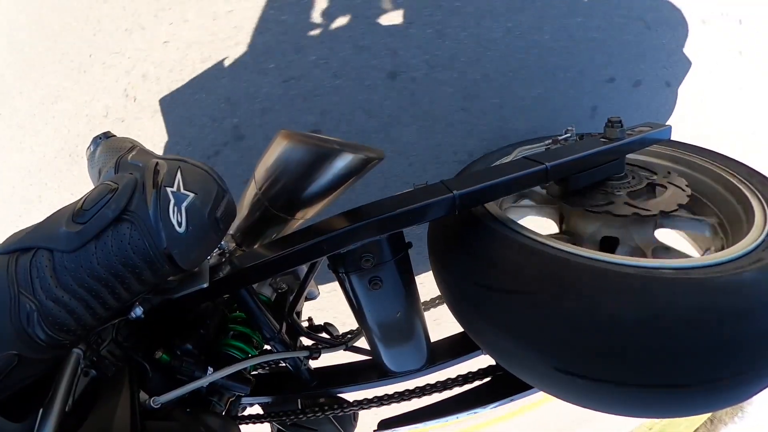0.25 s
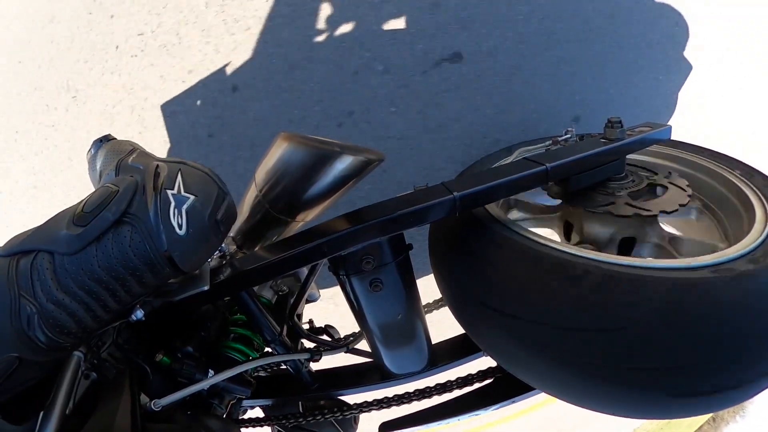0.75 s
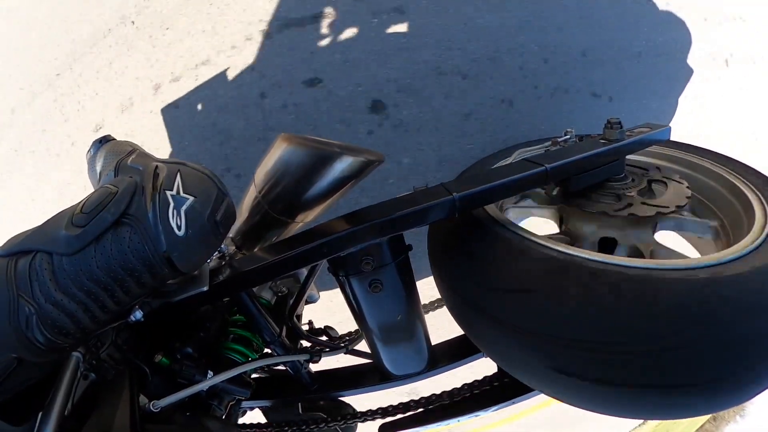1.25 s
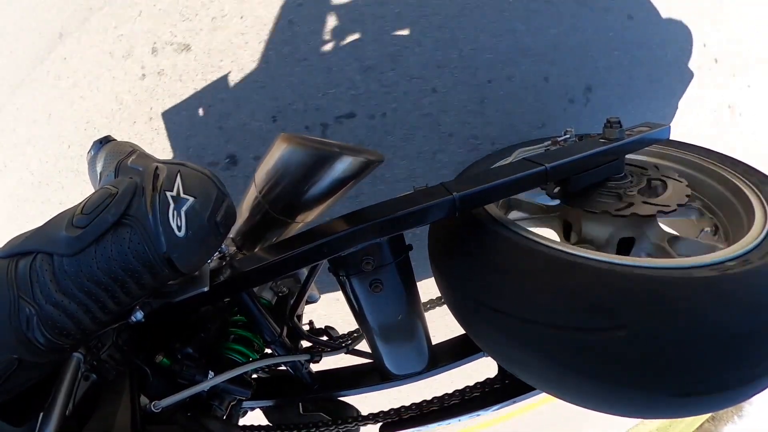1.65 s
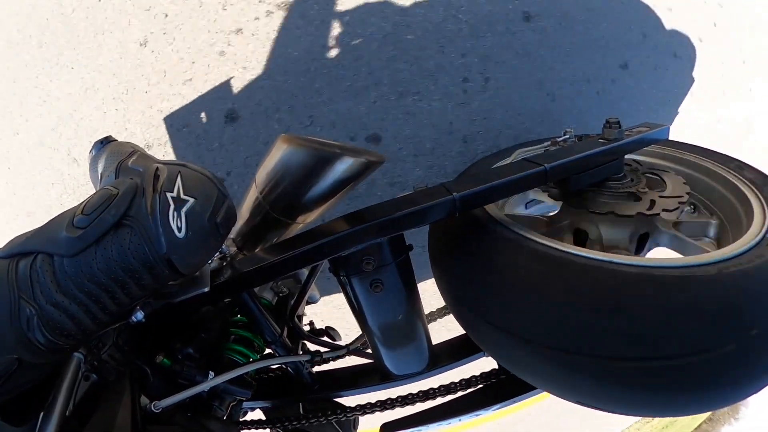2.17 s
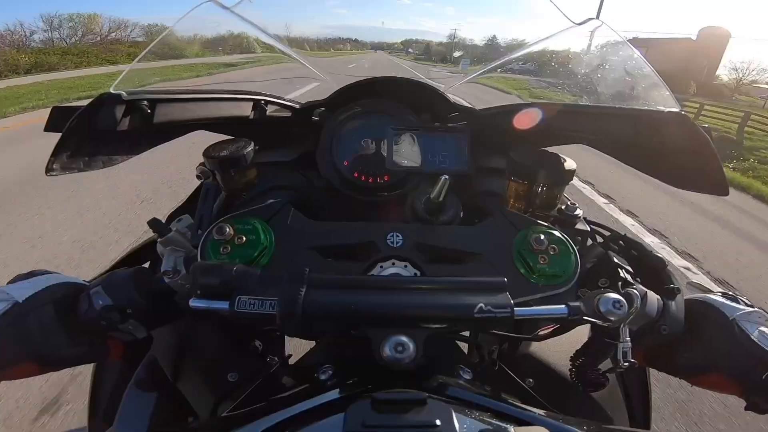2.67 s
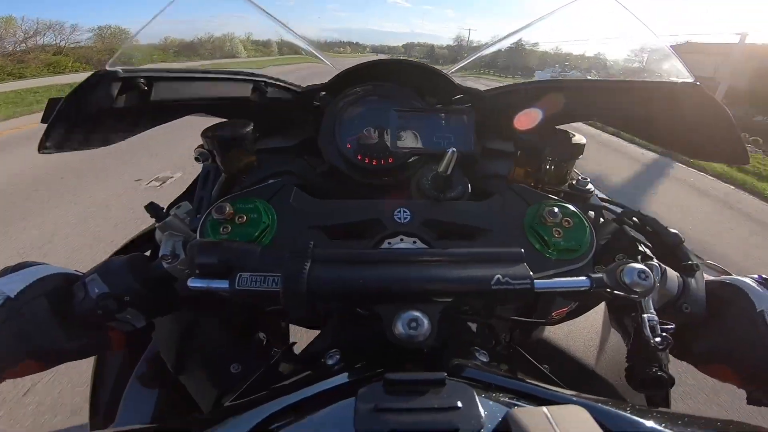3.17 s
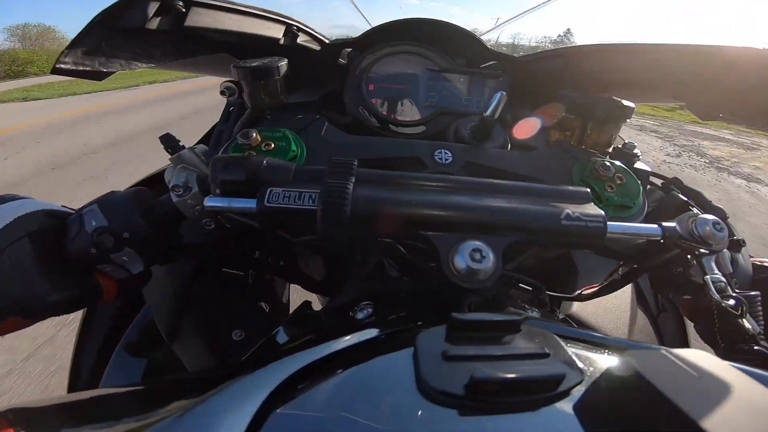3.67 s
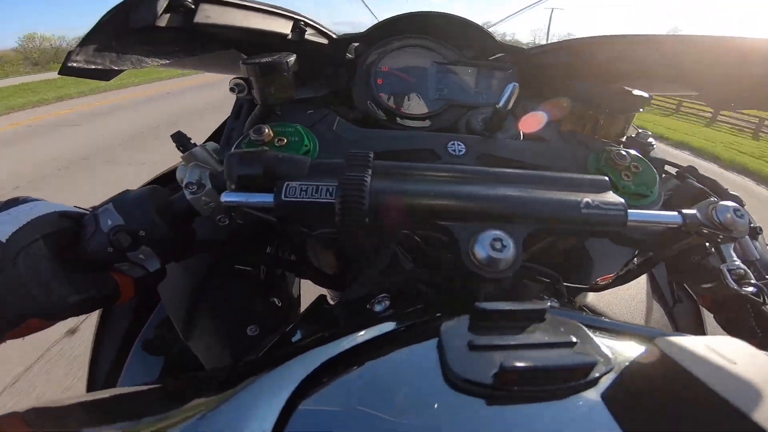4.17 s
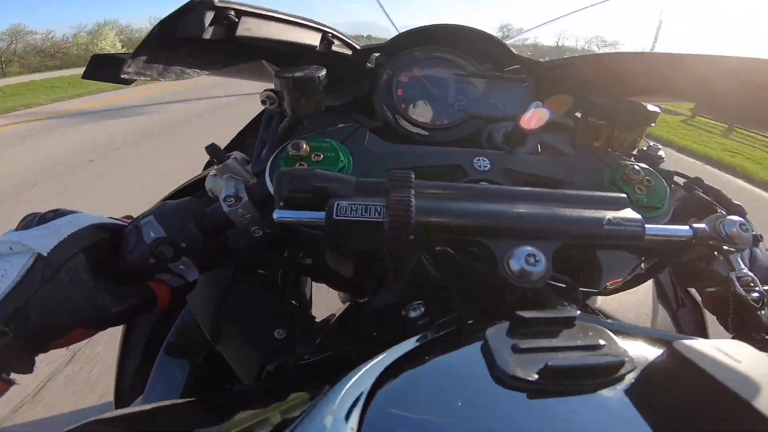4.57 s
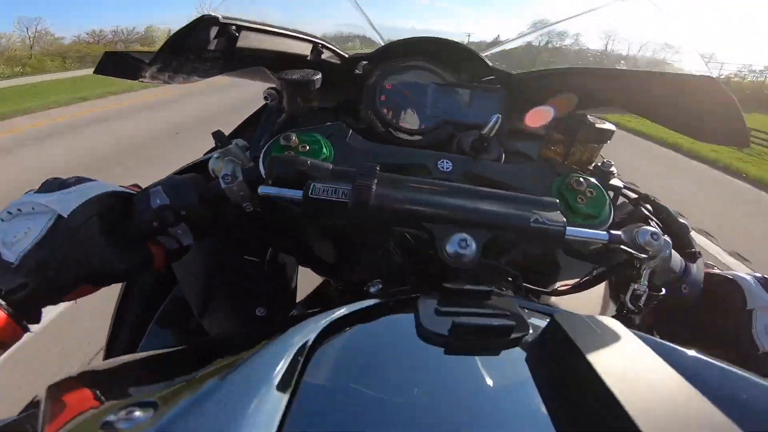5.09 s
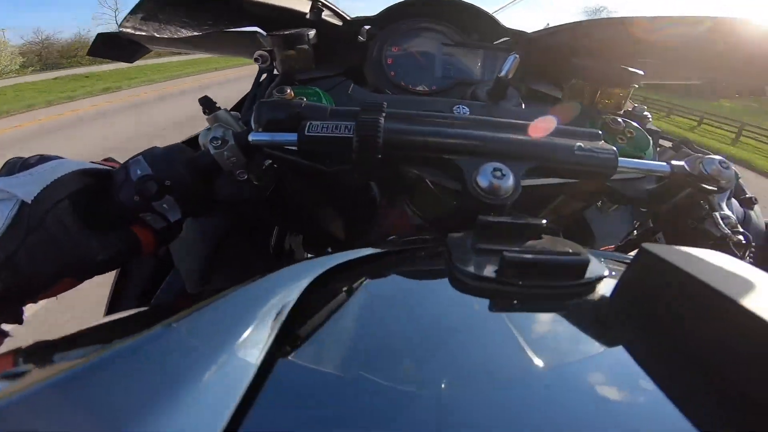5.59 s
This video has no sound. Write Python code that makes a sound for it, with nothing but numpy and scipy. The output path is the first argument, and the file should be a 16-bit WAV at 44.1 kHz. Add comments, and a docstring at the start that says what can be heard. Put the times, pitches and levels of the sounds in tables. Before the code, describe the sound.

A sport motorcycle burbles and blips dully near its rear wheel, then abruptly screams up in revs, shifts, and pulls again in the wind.

```python
"""Sport motorcycle, blips and pull

A four-cylinder engine heard from two places. First, dull and close by the rear wheel, five throttle blips
from low revs: beat harmonics boom, beats and gas noise ring the tail pipe. Then, from the tank, a hard pull,
an ignition cut for the gear shift and a second pull: orders of the four-stroke cycle through the pipe, with
pulsing hiss. Filtered noise makes rumble, rattle, ticks and wind on the microphone; one low push the thump.
"""
import sys
import numpy as np
from scipy import signal
from scipy.io import wavfile
from scipy.ndimage import uniform_filter1d

SR = 44100
rng = np.random.default_rng(int(sys.argv[2]) if len(sys.argv) > 2 else 0)


def unload_audio(sound):
    """Save the sound as a 16-bit wav file, at the path given as the first command line argument."""
    columns = np.transpose(np.atleast_2d(sound))
    # keep every value between -1 and 1, then stretch to whole-number steps
    steps = np.round(np.clip(columns, -1, 1) * 32767)
    wavfile.write(sys.argv[1], SR, steps.astype(np.int16))


def elevation(decibels):
    """Turn decibel levels (scalar or array-like) into linear amplitude ratios."""
    levels = np.asarray(decibels, float)
    return 10 ** (levels / 20)


N = 257544

# throttle blips: firing resumes t/s, revs climb t/s, throttle shuts t/s, revs down t/s, top rate/(beats/s)
BLIPS = [(-.3, -.25, -.08, .155, 49), (.232, .28, .52, .70, 55.7), (.70, .83, 1.06, 1.235, 48),
         (1.218, 1.33, 1.578, 1.72, 48.7), (1.70, 1.85, 2.09, 2.29, 51.2), (2.342, 2.385, 2.635, 2.85, 60)]
# silencer while firing: rate/(beats/s), boom harmonics 1, 2 and 3 level/dB, bark level/dB
SILENCER = [(31, -36, -13.5, -27, -20), (40, -25, -17, -20, -16.5), (46, -19, -18, -22, -13),
            (49, -17, -21, -27, -12), (55, -13.5, -24, -28, -12.5), (60, -14.5, -32, -27, -13)]
# tail pipe modes: f/Hz, width/Hz, level/dB
TAIL_PIPE_MODES = [(161.6, 77, -4.5), (237, 69, 7.5), (318.8, 37.3, 1.5), (506, 59, -12.5)]
# ragged rumble of the silencer: f/Hz, density/(dB per Hz)
RUMBLE_SPECTRUM = [(20, -12), (35, -4), (62, 0), (100, -3), (150, -5), (220, -14), (400, -45), (900, -95)]
# frame rattle: f/Hz, density/(dB per Hz)
RATTLE_SPECTRUM = [(300, -23), (500, 3), (700, -9.5), (950, -15.5), (1600, -17.5), (2700, -15.5),
                   (4000, -19), (6000, -26), (7400, -30.5), (8300, -42.5), (11500, -52.5), (14000, -79.5)]
LOW_BEATS_PER_S, BLIPS_END_S, THROTTLE_LAG_S = 31, 2.645, 0.015
UNEVEN_FIRING, UNEVEN_OVERRUN = 0.17, 0.3  # 0 steady .. 1 ragged
OVERRUN_BOOM_DB, OVERRUN_BARK_DB = -6.5, -7  # change while the throttle is shut
MISFIRE_DB = 4.5  # rms waver of the boom on the overrun
RUMBLE_DB, RUMBLE_SWING_DB, RATTLE_DB = -24.5, 2.4, -37

# engine speed, one list a gear: t/s, rate/(firings/s)
GEARS = [
    [(2.642, 199.2), (2.745, 201.2), (3.045, 216.3), (3.145, 225.3), (3.445, 250.4), (3.745, 281.0),
     (3.945, 305.2), (4.045, 312.4), (4.445, 359.5), (4.545, 392.3), (4.645, 412.6), (4.745, 423.7),
     (4.828, 426.3)],
    [(4.905, 333.0), (5.005, 337.3), (5.105, 332.8), (5.205, 340.7), (5.405, 353.9), (5.705, 378.4),
     (5.84, 385.7)],
]
# full throttle: rate/(firings/s), firing tones level/dB, howl level/dB, bite/(dB per octave), hiss level/dB
FULL_THROTTLE = [(201, -11, -34.5, -8.5, -42.5), (212.7, -10.5, -30, -5.5, -42.5),
                 (221.6, -10.5, -24, -5.5, -40.5), (239, -11, -29, -2, -38.5),
                 (270, -12, -24.5, -6.5, -35.5), (305, -7.5, -24.5, -4.5, -32),
                 (329, -9.5, -22.5, -1.5, -30), (370, -8.5, -23.5, 0, -30), (403, -7.5, -22, 0.5, -28.5),
                 (415, -7.3, -20, 3.5, -25)]
# added in each gear: tones level/dB, howl level/dB, bite/(dB per octave), hiss level/dB,
# start bang level/dB (as ignition returns, in the second gear)
GEAR_OFFSETS = [(0, -2.05, -1.5, -0.5, -0.5), (-0.5, -3.5, 3, -.5, 10.5)]
# pipe at the firing tones: f/Hz, level/dB
PIPE_AT_FIRING = [(200, 2), (260, 1), (305, -10), (350, -5), (420, -7.5), (520, -7), (610, -6.5), (720, -3),
                  (840, -7), (900, -9), (945, -31), (1000, -5.5), (1080, -7), (1180, -25.5), (1300, -39)]
# pipe at the other orders: f/Hz, level/dB
PIPE_AT_ORDERS = [(50, -5), (150, 2.5), (300, -5.5), (480, -6.5), (610, -9.5), (700, -2), (780, -1.5),
                  (950, -4.5), (1150, -5.5), (1380, -7), (1520, -11), (1700, -12), (1900, -12), (2200, -12),
                  (2500, -15.5), (2750, -15), (3500, -19), (5000, -33.5)]
# uneven cylinders, below and above SPLIT_ORDER: level/dB of orders 0, 1, 2 and 3 above a multiple of firing
LOW_ORDERS_DB = (5.5, -0.55, 0, -0.6)
HIGH_ORDERS_DB = (-2.5, -12.5, -3, 2.5)
# orders that break the pattern: order, added level/dB
STRAY_ORDERS_DB = {6: -5, 15: -6, 17: -3, 26: -4}
# gas hiss: f/Hz, density/(dB per Hz)
HISS_SPECTRUM = [(400, -18), (900, -9), (1500, -7), (2200, -5), (3400, -4.5), (5000, -6), (9400, -11),
                 (12500, -18), (15600, -27)]
SPLIT_ORDER, TOP_ORDER, BANG_DECAY_S = 30, 68, 0.011
BLADES_PER_FIRING = 31.3  # blower blade passes
WHINE_DB, WHINE_DB_PER_OCTAVE = -27.5, 10  # against the hiss, at 380 firings/s
THUMP_S, THUMP_DB, THUMP_RISE_S = 4.827, -5, 0.004

# loose metal ticks: t/s, level/dB
TICKS = [(.487, -44), (0.892, -36), (2.137, -36), (2.283, -50), (2.363, -54)]
# wind: t/s, buffet level/dB, rush level/dB
WIND = [(2.64, -19, -31), (3.0, -17, -29.5), (3.5, -19.5, -34), (3.8, -15, -31), (4.0, -13.5, -27),
        (4.599, -15.5, -35), (4.83, -13.5, -26.5), (5.2, -13.5, -27), (5.84, -14, -37.5)]
# buffet: f/Hz, density/(dB per Hz)
BUFFET_SPECTRUM = [(8, 4.5), (30, 2.5), (80, -5.5), (180, -7.5), (300, -17), (600, -36.5), (1200, -26),
                   (3000, -69.5)]
# rush: f/Hz, density/(dB per Hz)
RUSH_SPECTRUM = [(240, -33), (400, -8), (643, -8.5), (716, -2), (1040, -17), (1830, -15.5), (3810, -27.5),
                 (11200, -37), (15600, -47)]


def evened(x):
    """Scales to rms 1."""
    return x / np.sqrt(np.mean(x ** 2) + 1e-20)


def read(points, hz):
    """Reads a spectrum on a log-frequency axis."""
    f, value = np.transpose(points)
    return np.interp(np.log(hz + 1), np.log(f + 1), value)


def curves(rows, at):
    """Columns of a table read along its first column."""
    first, *columns = np.transpose(rows)
    return [np.interp(at, first, c) for c in columns]


def span(start_s, end_s):
    """Sample times between two moments, and a 2 ms fade at both ends."""
    t = np.arange(start_s, end_s, 1 / SR)
    return t, np.clip(np.minimum(t - start_s, end_s - t) / 0.002, 0, 1)


def add(mix, start_s, sound):
    """Mixes a sound in at start_s."""
    part = mix[round(start_s * SR):][:len(sound)]
    part += sound[:len(part)]


def noise(n, spectrum, patchy_db):
    """Random short-time spectra with drifting patches, rms 1."""
    real, imag, patches = rng.standard_normal((n // 256 + 5, 513, 3)).T
    patches = uniform_filter1d(patches, size=14, axis=0)  # across frequency
    patches = evened(uniform_filter1d(patches, size=8, axis=1))  # across time
    hz = np.fft.rfftfreq(1024, 1 / SR)
    z = (real + 1j * imag) * elevation(read(spectrum, hz)[:, None] + patchy_db * patches)
    return evened(signal.istft(z, nperseg=1024, noverlap=768)[1][:n])


def wander(n, size):
    """Noise smoothed twice over size steps, rms 1."""
    smooth = uniform_filter1d(rng.standard_normal(n), size)
    return evened(uniform_filter1d(smooth, size))


def ring(x, modes):
    """Damped modes struck by x, rms 1; their gradual onset keeps the treble dark."""
    t = np.arange(SR // 8) / SR
    shape = sum(elevation(db) * width * np.exp(-np.pi * width * t) * np.sin(2 * np.pi * hz * t)
                for hz, width, db in modes)
    shape = shape * (1 - np.exp(-t / 0.0024))
    return evened(signal.oaconvolve(x, shape)[:len(x)])


def throttle(t):
    """Revs climb on a quarter sine and sink on a half cosine; overrun from shutting until firing resumes."""
    rate, firing = np.full(len(t), LOW_BEATS_PER_S, float), np.zeros(len(t))
    for fires, climbs, shuts, down, top in BLIPS:
        up = np.clip((t - climbs) / (shuts - climbs), 0, 1)
        sink = np.clip((t - shuts) / (down - shuts), 0, 1)
        rise = np.sin(np.pi / 2 * up) * np.cos(np.pi / 2 * sink) ** 2
        rate = rate + (top - LOW_BEATS_PER_S) * rise
        firing = firing + np.clip((t - fires) / THROTTLE_LAG_S, 0, 1)
        firing = firing - np.clip((t - shuts) / THROTTLE_LAG_S, 0, 1)
    return rate, 1 - np.clip(firing, 0, 1)


def blips():
    """Exhaust beats boom in the silencer and crack in the tail pipe; on the overrun they turn ragged."""
    t, fade = span(0, BLIPS_END_S)
    n = len(t)
    rate, overrun = throttle(t)
    *tones_db, bark_db = curves(SILENCER, rate)
    bark_db = bark_db + OVERRUN_BARK_DB * overrun
    uneven = np.clip(UNEVEN_FIRING + (UNEVEN_OVERRUN - UNEVEN_FIRING) * overrun, 0, 1)
    turns = np.cumsum(rate) / SR  # one per exhaust beat
    boom = sum(-np.sqrt(2) * elevation(db) * np.cos(k * (2 * np.pi * turns - 0.65))
               for k, db in enumerate(tones_db, 1))

    beats = np.diff(np.floor(turns), prepend=0) / np.sqrt(rate)
    beats = beats * elevation(0.35 * uneven * rng.standard_normal(n))
    flow = rng.standard_normal(n)  # turbulent gas between the beats
    drive = (1 - uneven) * -evened(beats - beats.mean()) + 2.6 * uneven * flow
    bark = ring(drive, TAIL_PIPE_MODES)

    rattle = noise(n, RATTLE_SPECTRUM, patchy_db=1.93) * (1 + 0.14 * np.cos(2 * np.pi * turns - 0.8))
    rattle *= elevation(0.11 * bark_db)  # the frame buzzes a little more under throttle

    rumble_gain = elevation(RUMBLE_DB + RUMBLE_SWING_DB * wander(n, size=2000))
    rumble = rumble_gain * noise(n, RUMBLE_SPECTRUM, patchy_db=1.0)
    boom_gain = elevation((OVERRUN_BOOM_DB + MISFIRE_DB * wander(n, size=900)) * overrun)
    return 0, fade * (boom_gain * boom + rumble + elevation(bark_db) * bark + elevation(RATTLE_DB) * evened(rattle))


def firing_tones(cycle, rate):
    """Firing rate and its next two harmonics, weighted by the pipe."""
    return sum(-elevation(read(PIPE_AT_FIRING, k * rate)) * np.cos(4 * k * cycle + 0.6 * k * k)
               for k in (1, 2, 3))


def order_howl(cycle, rate, bite_db):
    """Remaining orders of the four-stroke cycle through the pipe, each wavering in level."""
    n = len(rate)
    howl, coarse = np.zeros(n), np.arange(0, n, 64)
    for k in range(1, TOP_ORDER + 1):
        if k in (4, 8, 12):  # the firing tones
            continue
        hz = k * rate[coarse] / 4
        pattern_db = LOW_ORDERS_DB if k < SPLIT_ORDER else HIGH_ORDERS_DB
        order_db = pattern_db[k % 4] + STRAY_ORDERS_DB.get(k, 0)
        tilt_db = bite_db[coarse] * np.log2(np.maximum(hz, 1400) / 1500)
        level_db = order_db + read(PIPE_AT_ORDERS, hz) + tilt_db
        level_db += 3.8 * wander(len(hz), size=70)  # the cylinders never burn quite alike
        gain = np.interp(np.arange(n), coarse, elevation(level_db))
        howl += gain * np.cos(k * cycle + 2 * np.pi * rng.random())
    return howl


def gas_hiss(cycle, rate):
    """Gas noise pulsing with firings and cycle, plus a faint blower whine at the blade rate."""
    n = len(rate)
    hiss = noise(n, HISS_SPECTRUM, patchy_db=1.1)
    hiss = hiss * (1 + 0.25 * np.cos(4 * cycle) + 0.12 * np.cos(cycle))
    whine_db = WHINE_DB + WHINE_DB_PER_OCTAVE * np.log2(rate / 380) + 4.9 * wander(n, size=2500)
    return hiss + elevation(whine_db) * np.cos(4 * BLADES_PER_FIRING * cycle)


def pull(speed, offsets):
    """One gear: firing tones, howl and hiss locked to one engine cycle of four firings."""
    t, fade = span(speed[0][0], speed[-1][0])
    (rate,) = curves(speed, t)
    tones_db, howl_db, bite_db, hiss_db = (
        c + more for c, more in zip(curves(FULL_THROTTLE, rate), offsets))
    bang = elevation(offsets[-1] * np.exp(-(t - t[0]) / BANG_DECAY_S))
    cycle = 2 * np.pi * np.cumsum(rate / 4) / SR
    cycle = cycle + 0.003 * wander(len(t), size=300)  # combustion timing scatters, rad
    tones = firing_tones(cycle, rate)
    howl = order_howl(cycle, rate, bite_db)
    hiss = gas_hiss(cycle, rate)
    return t[0], fade * (elevation(tones_db) * tones + bang * (elevation(howl_db) * howl + elevation(hiss_db) * hiss))


def thump():
    """Low push as the drive unloads: rises fast, sags slowly."""
    out, u = np.zeros(N), np.arange(SR // 10) / SR / THUMP_RISE_S
    add(out, THUMP_S, elevation(THUMP_DB) * u * np.exp(1 - u))
    return 0, out


def ticks():
    """Something loose: short bright bursts of decaying band-passed noise."""
    out, t = np.zeros(N), np.arange(1500) / SR
    band = signal.butter(7, [1500, 7600], "band", fs=SR, output="sos")
    for start_s, db in TICKS:
        burst = np.exp(-t / 0.029) * rng.standard_normal(len(t))
        add(out, start_s, elevation(db) * signal.sosfilt(band, burst))
    return 0, out


def wind():
    """Lumpy low buffeting on the microphone and a smoother rush of air, both shaped noise."""
    t, fade = span(WIND[0][0], WIND[-1][0])
    n = len(t)
    buffet_db, rush_db = curves(WIND, t)
    buffet = noise(n, BUFFET_SPECTRUM, patchy_db=0.0) * elevation(1.2 * wander(n, size=1200))
    rush = noise(n, RUSH_SPECTRUM, patchy_db=1.1)
    return t[0], fade * (elevation(buffet_db) * evened(buffet) + elevation(rush_db) * rush)


def scene():
    """Blips and ticks, then both gears and the shift under the wind."""
    mix = np.zeros(N)
    pulls = [pull(speed, offsets) for speed, offsets in zip(GEARS, GEAR_OFFSETS)]
    for start_s, sound in [blips(), *pulls, thump(), ticks(), wind()]:
        add(mix, start_s, sound)
    return mix[None]


def roll_off(x):
    """The treble ends steeply here."""
    return signal.sosfilt(signal.butter(12, 15780, fs=SR, output="sos"), x)


def record(dry):
    """The small microphone saturates softly."""
    ceiling = 1.2
    mix = ceiling * np.tanh(dry / ceiling)
    return roll_off(mix)


dry = scene()
out = record(dry)
unload_audio(out)
```